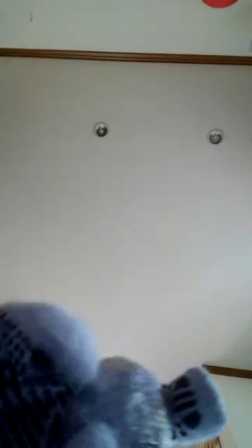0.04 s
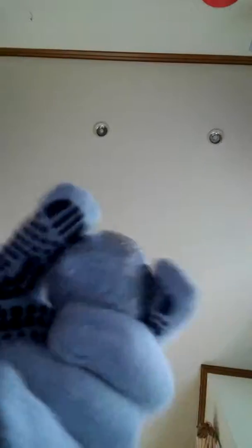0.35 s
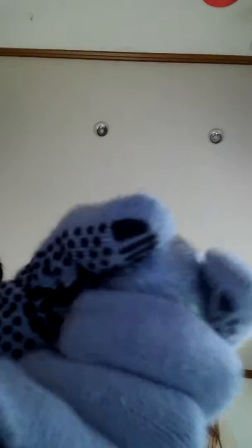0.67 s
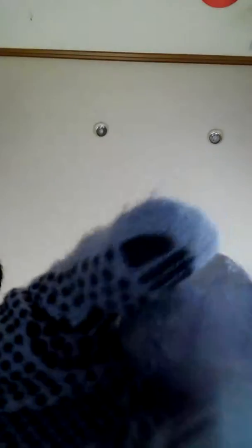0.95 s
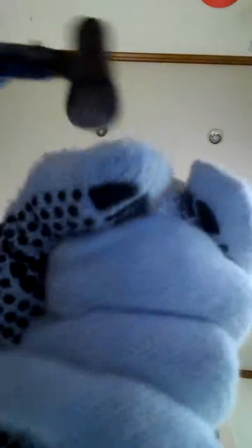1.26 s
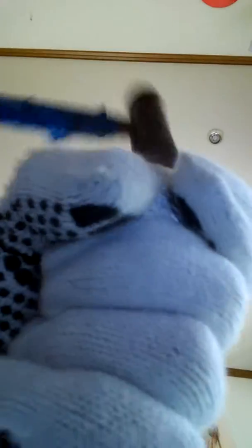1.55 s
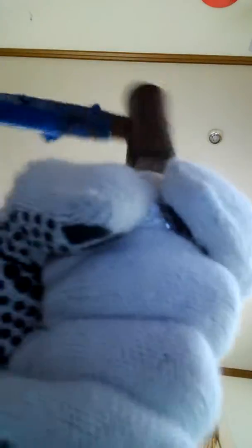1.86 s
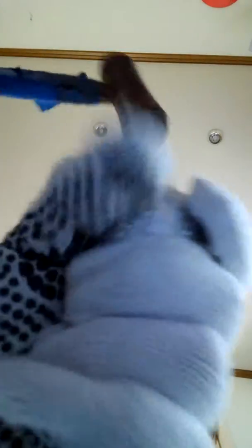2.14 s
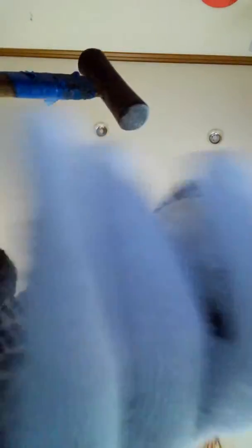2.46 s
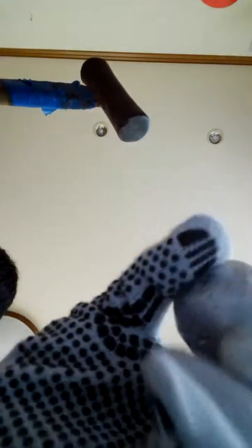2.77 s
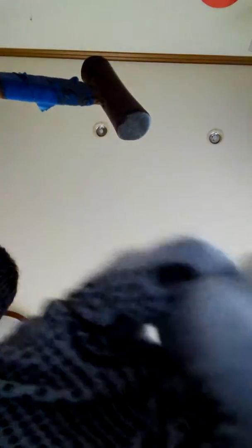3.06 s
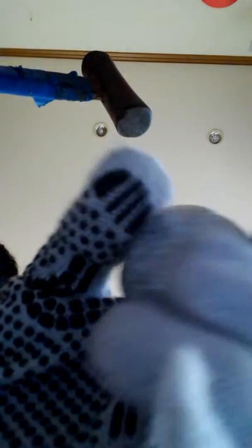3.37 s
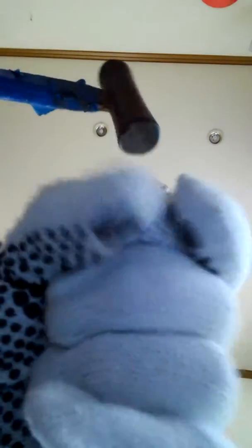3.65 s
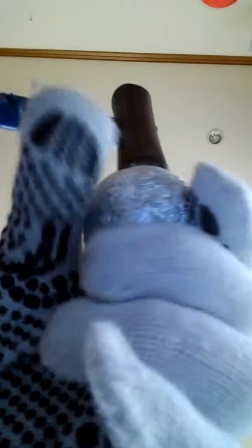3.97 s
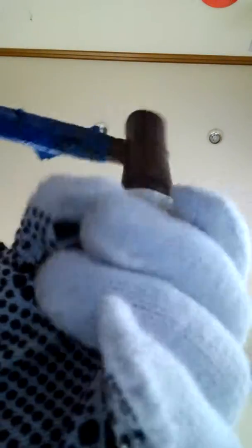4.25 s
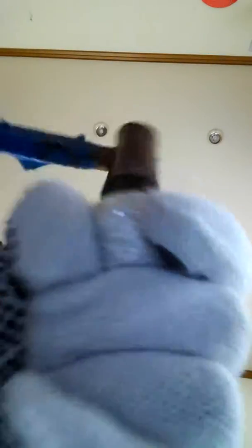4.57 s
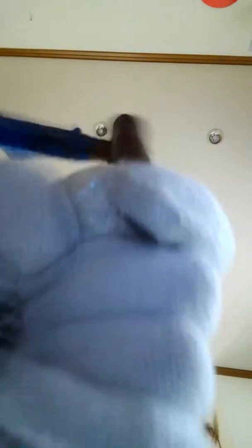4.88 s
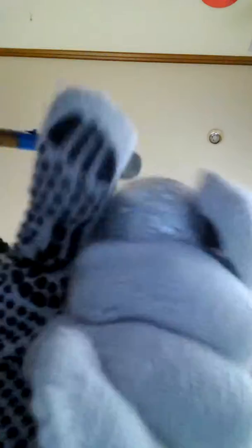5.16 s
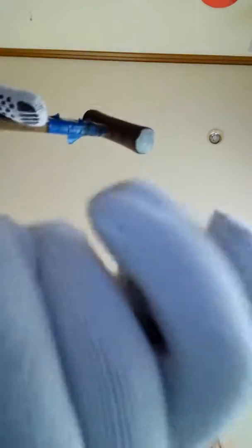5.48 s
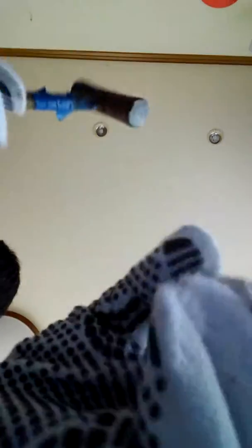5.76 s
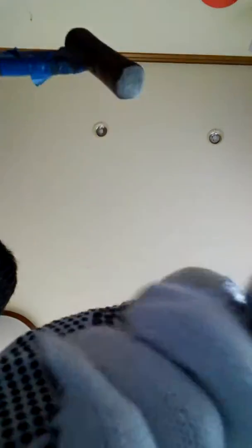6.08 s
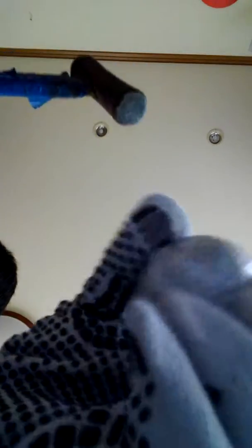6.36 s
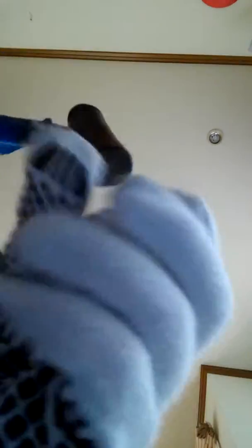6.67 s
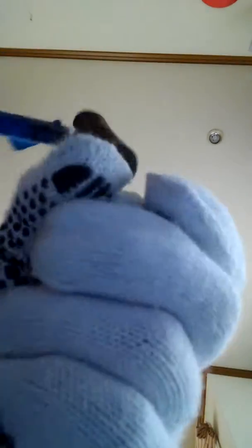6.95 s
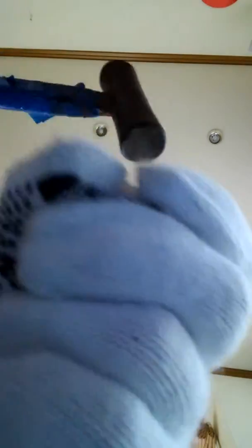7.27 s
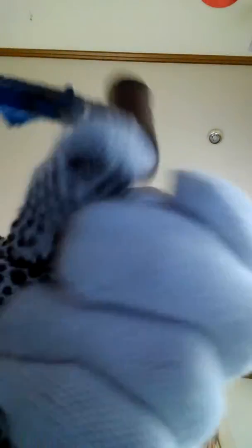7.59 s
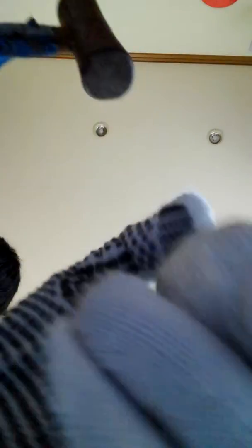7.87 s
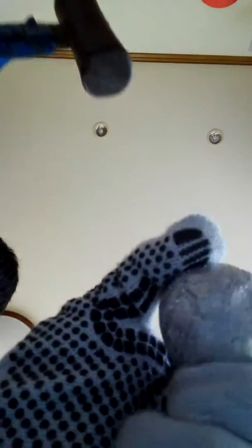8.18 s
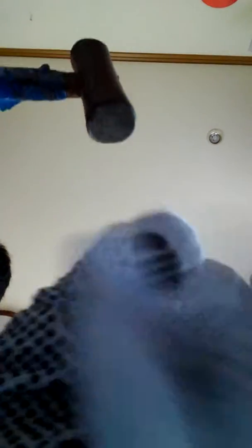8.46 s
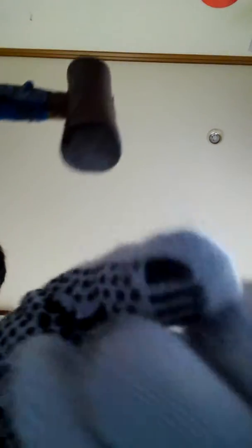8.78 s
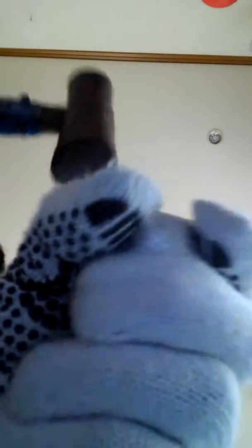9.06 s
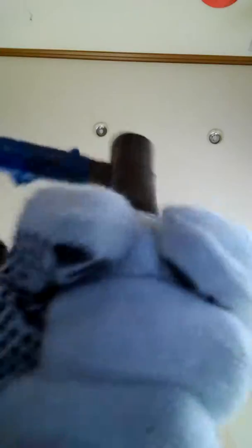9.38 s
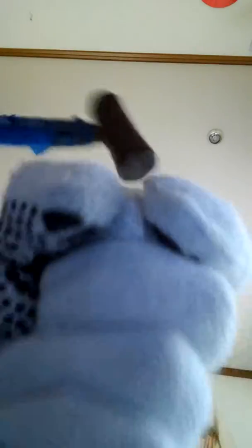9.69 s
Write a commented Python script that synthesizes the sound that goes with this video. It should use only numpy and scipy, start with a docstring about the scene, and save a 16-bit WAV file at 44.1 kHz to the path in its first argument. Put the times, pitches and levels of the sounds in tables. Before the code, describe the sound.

A small hammer taps a hard-packed foil ball held in a knitted glove. Each tap is a dead thud with a short, crisp crack. The taps come in quick groups of three, four, three and two, and between them the glove turns the ball with soft rustles and tiny snags. It is close to the microphone in a small room, with faint hiss and a deep drone that swells and fades early on.

```python
"""Hammer on a foil ball

A small hammer taps a hard-packed foil ball held in a knitted glove, close by in a small room.
Each tap is a dead thud with a short crack of buckling foil. Between the groups of taps the glove
turns the ball, rustling and snagging. Under it lie room hiss, faint hums and a deep drone that
swells and sinks in pitch, like a vehicle outside."""
import sys
import numpy as np
from scipy import signal
from scipy.fft import rfft, irfft
from scipy.io import wavfile
from scipy.ndimage import uniform_filter1d

SR = 44100
rng = np.random.default_rng(int(sys.argv[2]) if len(sys.argv) > 2 else 0)


def put_to_file(sound):
    """Save the sound as 16-bit audio at rate SR, in the file named by the first command-line argument."""
    columns = np.atleast_2d(sound).T  # one column per channel
    safe = np.clip(columns, -1, 1)
    whole_steps = np.round(safe * 32767)
    wavfile.write(sys.argv[1], SR, whole_steps.astype(np.int16))


N = 429093
TIME = np.arange(N) / SR

# Modes of the packed foil. Each row: centre in Hz, width in Hz, gain in dB.
FOIL_MODES = [(1120, 1650, -9), (2650, 2940, -10.5), (3200, 1040, -5.5), (6350, 970, -14),
              (9200, 1450, -13.5)]
# Hammer blows. Each row: start in seconds, thud gain in dB, contact in ms, crack gain in dB,
# ring of the struck spot in Hz, delay of the second buckle in ms, its relative size,
# tilt of the foil modes in dB per octave, gain of the treble passing the fingers in dB.
TAPS = [(1.6119, -24, 1.8, -11, 5970, 0.26, 0.55, -6.5, 0), (1.801, -23.5, 1.97, -6, 1440, 0.2, 0.2, 7, -2),
        (2.0001, -14.5, 1.01, 1, 2010, 0.31, .43, 6.5, -4.5),
        (4.2197, -30, 1.5, -19.5, 1826, 0.43, 0.69, 0, -1.5),
        (4.5285, -14, 1.2, .5, 1830, .18, 0.39, -0.5, -1),
        (4.7291, -15.5, 1.17, 3, 1970, 0.06, 0.71, -4, -2.5),
        (4.925, -12, 1.22, 3.5, 2616, .17, 0.23, 7, 1), (7.1448, -19, 1.98, -9.5, 3227, 0.41, 0.32, -6, -9),
        (7.3509, -17.5, 1.64, -8.5, 4330, 0.4, 0.45, -7.5, -7),
        (7.5376, -14, 1.22, 1.6, 4080, 0.13, 0.24, -1, -5),
        (9.3646, -14.5, 1.18, -5.5, 1287, .64, 0.65, -0.5, -1.5),
        (9.5571, -13.5, 0.93, 3.5, 1590, 0.56, 0.77, 3, 4.5)]


def hammer(foil_top_hz=9430, finger_shade_hz=5200, size=16384, lead=64):
    """A half-sine push shoves the ball and the foil buckles twice. Returns direct sound, room feed."""
    direct, room_feed = np.zeros(N), np.zeros(N)
    f = np.fft.rfftfreq(size, 1 / SR)
    time_ms = np.arange(size) / SR * 1000
    ball = resonance(f, hz=529, width_hz=1280)
    hand_sway = amp(-3) * resonance(f, hz=43, width_hz=49)
    rolloff = 1 / (1 + (f / foil_top_hz) ** 8) + amp(-26)
    shaded_band = 1 - 1 / (1 + (f / finger_shade_hz) ** 16)
    whole_ring = sum(amp(db) * resonance(f, hz, width_hz) for hz, width_hz, db in FOIL_MODES)
    for start_s, thud_db, contact_ms, crack_db, spot_hz, gap_ms, second, tilt_db, shade_db in TAPS:
        push = np.sin(np.pi * np.minimum(time_ms / contact_ms, 1))
        thud = amp(thud_db) * (ball + hand_sway) * rfft(push)
        buckles = second * np.exp(-2j * np.pi * f * gap_ms / 1000) - 1
        tilted_ring = sum(amp(db + tilt_db * np.log2(hz / 3200)) * resonance(f, hz, width_hz)
                          for hz, width_hz, db in FOIL_MODES)
        spot_ring = resonance(f, spot_hz, 0.33 * spot_hz)
        crack = amp(crack_db + shade_db * shaded_band) * buckles * (tilted_ring + spot_ring)
        radiated = -amp(1.7 + 0.98 * crack_db) * whole_ring
        for mix, foil in ((direct, crack), (room_feed, radiated)):
            add(mix, start_s - lead / SR, np.roll(irfft(thud + rolloff * foil), lead))
    return direct, room_feed


# Spectrum of knit rubbing foil. Each row: frequency in Hz, gain in dB.
KNIT_SPECTRUM = [(300, -7), (1000, -8.5), (1700, -6.5), (2500, 0.5), (3700, 1.5), (5200, 2), (6600, 3),
                 (8000, -1.5), (9600, -2), (11500, -17), (16000, -25)]


def knit(f):
    """Gain of the knit-on-foil friction spectrum at f in Hz."""
    return amp(lookup(KNIT_SPECTRUM, f))


def glove(slips_per_s=6000, split_hz=5600, scrape_width_hz=480, rest_hz=3870, flutter_db=1.52):
    """Fibres slip over the foil in dense tiny clicks, through a resonance that moves with the grip."""
    level_db, scrape_hz, swell_s = sliding(rest_hz)
    slips = rng.standard_normal(N) * (rng.random(N) < slips_per_s / SR) * grain(N, step_db=-1)
    dull = unit_rms(colour(slips, lambda f: knit(f) / np.sqrt(1 + (f / split_hz) ** 8)))
    bright = unit_rms(colour(slips, lambda f: 1j * knit(f) / np.sqrt(1 + (split_hz / (f + 1)) ** 8)))
    carrier = np.exp(2j * np.pi * np.cumsum(scrape_hz) / SR)
    pole = np.exp(-np.pi * scrape_width_hz / SR)
    scrape = unit_rms((carrier * signal.lfilter([1 - pole], [1, -pole], dull / carrier)).real)
    # A gentle slide rings, a hard one turns to hiss.
    ring = amp(-7.5 - 0.5 * np.clip(level_db + 63.5, -4, 12))
    body = (dull + ring * scrape) / np.sqrt(1 + ring + ring ** 2)
    # A higher scrape is also brighter.
    bright_db = -3 + 5.5 * np.log2(scrape_hz / rest_hz)
    bright_share = np.clip(amp(bright_db) ** 2, 0.05, 0.9)
    envelope = amp(level_db - 1 + flutter_db * wander(rate_hz=54)) * ribs(level_db, swell_s)
    return envelope * (np.sqrt(1 - bright_share) * body + np.sqrt(bright_share) * bright)


# Slides of the glove over the ball. Each row: peak time in seconds, swell in seconds,
# fade in seconds, level in dB, scrape resonance in Hz.
STROKES = [(.835, .07, .045, -56.5, 3730), (0.916, .022, .045, -53.5, 4600), (1.1, 0.073, .12, -63.5, 3280),
           (1.212, 0.03, 0.041, -55, 4230), (1.3, 0.026, 0.027, -58, 2900),
           (2.181, 0.013, .012, -57.5, 4540), (2.255, 0.068, 0.053, -59.5, 4100),
           (2.607, 0.021, .025, -63.5, 3680), (2.42, 0.087, 0.14, -68.5, 3870),
           (2.69, 0.041, 0.062, -63, 3900), (2.9, .015, .02, -64, 3020), (3.44, 0.075, 0.18, -64, 3730),
           (3.658, 0.045, 0.024, -51, 3950), (3.735, .013, 0.0454, -58.5, 3460),
           (3.92, 0.026, 0.073, -66, 3500), (4.41, 0.18, 0.042, -65.5, 4100),
           (4.665, 0.033, 0.023, -66, 3310), (5.091, 0.082, 0.057, -59.5, 4150),
           (5.157, 0.049, 0.048, -55, 4970), (5.28, 0.083, 0.051, -60, 3960),
           (5.43, 0.047, 0.042, -53.5, 4330), (5.57, 0.078, 0.051, -61, 3480),
           (5.648, 0.026, 0.038, -59, 4600), (5.76, 0.068, 0.15, -61.5, 4340),
           (5.912, 0.032, 0.07, -55.5, 3790), (6.0, 0.069, 0.076, -65, 3580),
           (6.23, 0.038, 0.018, -63, 3910), (6.472, 0.025, 0.016, -58.5, 3760),
           (6.66, 0.054, 0.052, -60.5, 3740), (7.075, 0.2, 0.041, -60, 4000),
           (7.285, 0.013, 0.015, -58, 3700), (7.682, 0.022, .018, -57.5, 3700),
           (8.08, 0.086, 0.037, -71, 3360), (8.33, .022, 0.019, -57.5, 4230),
           (8.376, 0.0031, 0.0059, -49.5, 4120), (8.551, 0.081, 0.12, -70.5, 3420),
           (8.87, .05, 0.082, -64, 4540), (9.302, .01, 0.018, -59, 4400), (9.69, 0.017, 0.018, -64, 3500)]


def sliding(rest_hz, creep_db=-78, creep_swing_db=7, roundness=1.53, hop=32):
    """Strokes swell and fade over the creep of the grip. Returns level_db, scrape_hz, swell_s."""
    t = TIME[::hop]
    power = amp(creep_db + creep_swing_db * wander(rate_hz=4.4)[::hop]) ** 2
    weighted_hz, weighted_swell = power * rest_hz, 0
    for peak_s, swell_s, fade_s, db, hz in STROKES:
        from_peak = np.maximum((peak_s - t) / swell_s, (t - peak_s) / fade_s)
        stroke_power = (amp(db) * np.exp(-from_peak ** roundness)) ** 2
        power += stroke_power
        weighted_hz += stroke_power * hz
        weighted_swell += stroke_power * swell_s
    controls = 10 * np.log10(power), weighted_hz / power, weighted_swell / power
    return [np.interp(TIME, t, control) for control in controls]


def ribs(level_db, swell_s, mid_hz=125, mid_db=-61, db_per_octave=7, bite_db_per_s=36):
    """Knit ribs pulse the rub: faster in strong strokes, deeper in slowly swelling ones."""
    rate_hz = mid_hz * 2 ** np.clip((level_db - mid_db) / db_per_octave, -1, 1)
    cycles = np.cumsum(rate_hz * np.exp(0.16 * wander(rate_hz=12.24))) / SR
    bite = amp(bite_db_per_s * swell_s * np.sin(2 * np.pi * cycles))
    return bite / np.sqrt(uniform_filter1d(bite ** 2, size=2048))


# Catches of the knit. Each row: start in seconds, length in seconds, level in dB, centre in Hz.
SNAGS = [(2.99, .006, -64, 4020), (3.022, 0.0088, -64, 2700), (3.717, 0.0052, -56.5, 4070),
         (3.912, 0.0044, -59, 4050), (4.445, .003, -56, 6000), (5.507, .0023, -55.5, 6140),
         (5.89, 0.0025, -52, 6050), (5.9465, 0.0026, -50.5, 5530), (6.476, .006, -58, 4000),
         (6.562, 0.0057, -60.5, 3400), (7.776, .0036, -56.5, 3170), (7.969, 0.0028, -51.5, 4170),
         (8.367, .013, -47.5, 4150), (8.484, 0.015, -59, 2680), (8.615, 0.0033, -52, 4450),
         (9.289, .004, -55, 4470), (9.507, 0.0066, -57, 4650)]


def snags(width_hz=3500):
    """The knit catches on a ridge of foil and lets go."""
    out = np.zeros(N)
    for start_s, length_s, db, hz in SNAGS:
        add(out, start_s, amp(db) * burst(length_s, lambda f: knit(f) * resonance(f, hz, width_hz)))
    return out


# Quick runs of the ribs. Each row: start in seconds, length in seconds, first and last rate in Hz,
# level in dB.
ZIPS = [(1.202, .018, 4200, 2900, -59), (5.571, .012, 2300, 3300, -60), (5.609, .014, 6000, 5100, -58),
        (5.635, .02, 4600, 2500, -57)]


def zips(jitter=0.21):
    """Ribs zip over a ridge of foil in a rough chirp whose pitch follows the sliding speed."""
    out = np.zeros(N)
    for start_s, length_s, first_hz, last_hz, db in ZIPS:
        hz = np.geomspace(first_hz, last_hz, int(length_s * SR))
        cycles = np.cumsum(hz * (1 + jitter * rng.standard_normal(len(hz)))) / SR
        tone = sum(knit(k * hz) * np.sin(2 * np.pi * k * cycles) for k in (1, 2, 3))
        add(out, start_s, amp(db) * unit_rms(tone * np.hanning(len(hz))))
    return out


# Rubs of the grip. Each row: start in seconds, length in seconds, level in dB, centre in Hz,
# width in Hz.
SCUFFS = [(3.6, 0.12, -57, 238, 72.5), (3.69, 0.079, -58.5, 148.6, 90), (3.695, 0.15, -63, 290, 49.7),
          (3.7, 0.115, -62, 1100, 685)]


def scuffs():
    """The grip closes on the ball with muffled bursts of noise."""
    out = np.zeros(N)
    for start_s, length_s, db, hz, width_hz in SCUFFS:
        add(out, start_s, amp(db) * burst(length_s, lambda f: steep_band(f, hz, width_hz)))
    return out


def recoils(full_thud_db=-12, full_length_s=0.041, delay_s=0.0053, hz=4350, width_hz=3500):
    """The ball jumps back and rasps on the knit; a heavier thud gives a longer, softer rasp."""
    out = np.zeros(N)
    for tap_s, thud_db, *_ in TAPS:
        force_db = thud_db - full_thud_db
        length_s = full_length_s * 2 ** (force_db / 1.5)
        rasp = burst(length_s, lambda f: knit(f) * resonance(f, hz, width_hz))
        add(out, tap_s + delay_s, amp(-52.5 - 0.4 * force_db) * rasp)
    return out


# Diffuse tail of the room. Each row: frequency in Hz, gain in dB, 60 dB decay time in seconds.
ROOM_BANDS = [(80, -0.5, 0.29), (161, -17, 0.1), (298, -23.5, 0.8), (490, -11.5, 0.22), (800, -14, 0.22),
              (1350, -12, 0.27), (2530, -14, 0.13), (3970, -18.5, 0.28), (6400, -11, 0.2),
              (10000, -11.5, 0.21), (15000, 3, 0.13)]
# Reflections off nearby surfaces. Each row: delay in seconds, gain in dB.
REFLECTIONS = [(.0027, -22), (.0062, -26.5), (.0082, -24), (0.015, -26.5), (0.016, -28.5), (.0222, -51),
               (0.0285, -26.5)]


def room(x, onset_s=0.0037, build_s=0.0022, size=22050):
    """Early reflections and a short diffuse tail, each band dying at its own speed."""
    hz, t, bands = signal.stft(rng.standard_normal(size), SR, nperseg=256)
    t60_s = lookup(ROOM_BANDS, hz, column=2)[:, None]
    energy = t60_s * SR / (2 * np.log(1000))
    bands = bands * amp(lookup(ROOM_BANDS, hz)[:, None] - 60 * t / t60_s) / np.sqrt(energy)
    build = np.clip((TIME[:size] - onset_s) / build_s, 0, 1)
    response = signal.istft(bands, SR, nperseg=256)[1][:size] * build
    for delay_s, db in REFLECTIONS:
        add(response, delay_s, amp([db]))
    return signal.fftconvolve(x, response)[:N]


def drone(high_hz=48, low_hz=29.57, sink_mid_s=2.95, sink_s=0.47, peak_s=2.56, peak_db=-42, stop_s=3.37):
    """A deep tone from outside sinks in pitch as it grows, eases off and dies away."""
    grow_db_per_s, ease_db_per_s, stop_db_per_s = 18, 7, 40
    hz = low_hz + (high_hz - low_hz) / (1 + np.exp((TIME - sink_mid_s) / sink_s))
    db = peak_db + np.minimum(grow_db_per_s * (TIME - peak_s), ease_db_per_s * (peak_s - TIME))
    db -= stop_db_per_s * np.maximum(TIME - stop_s, 0)
    return np.sqrt(2) * amp(db) * np.sin(2 * np.pi * np.cumsum(hz) / SR)


# Building hums. Each row: start in seconds, end in seconds, centre in Hz, width in Hz, level in dB.
HUMS = [(.3, 2.6, 194, 9.8, -71), (.3, 9.8, 368, 14, -80.5), (5.7, 10, 730, 65, -80),
        (5.9, 8.2, 1080, 163, -79)]


def hums(fade_s=0.5):
    """Faint hums in the building: narrow noise bands that waver, come and go."""
    out = np.zeros(N)
    for start_s, end_s, hz, width_hz, db in HUMS:
        gate = np.clip(np.minimum(TIME - start_s, end_s - TIME) / fade_s, 0, 1)
        out += amp(db) * gate * noise(lambda f: steep_band(f, hz, width_hz))
    return out


def hiss(level_db=-74.5, hz=8600, width_hz=2200, end_s=4.6, fade_s=0.96):
    """A fine high hiss lies under the first turns of the ball and fades away."""
    gate = np.clip((end_s - TIME) / fade_s, 0, 1)
    return amp(level_db) * gate * noise(lambda f: steep_band(f, hz, width_hz) * knit(f))


# Spectrum of the still room. Each row: frequency in Hz, relative density in dB.
AIR_SPECTRUM = [(20, -0.5), (35, 5), (50, 3.5), (70, -4.5), (120, -11.5), (230, -12.5), (310, -20),
                (420, -20.5), (600, -25), (1200, -29), (3000, -30.5), (6000, -33), (9000, -32.5),
                (12000, -33.5), (16000, -36.5)]


def air(level_db=-59):
    """Steady low rumble and hiss."""
    return amp(level_db) * noise(lambda f: amp(lookup(AIR_SPECTRUM, f)))


def amp(db):
    """Decibels to gain."""
    return 10 ** (np.asarray(db) / 20)


def unit_rms(x):
    """Scales to rms 1."""
    return x / np.sqrt(np.mean(x ** 2) + 1e-20)


def lookup(table, hz, column=1):
    """One column of a table, interpolated over log frequency."""
    columns = np.transpose(table)
    return np.interp(np.log(hz + 1), np.log(columns[0] + 1), columns[column])


def add(mix, start_s, sound):
    """Adds a sound into the mix in place."""
    part = mix[round(start_s * SR):][:len(sound)]
    part += sound[:len(part)]


def resonance(f, hz, width_hz):
    """Complex response of a damped mode, gain 1 at its centre."""
    return 1j * f * width_hz / (hz ** 2 - f ** 2 + 1j * f * width_hz)


def steep_band(f, hz, width_hz):
    """A resonance applied twice for steep skirts."""
    return resonance(f, hz, width_hz * 1.66) ** 2


def colour(x, response):
    """Filters x by a function of frequency."""
    return irfft(rfft(x) * response(np.fft.rfftfreq(len(x), 1 / SR)), len(x))


def noise(response):
    """Coloured noise of rms 1."""
    return unit_rms(colour(rng.standard_normal(N), response))


def wander(rate_hz):
    """Slow random drift of rms 1."""
    return noise(lambda f: np.exp(-(f / rate_hz) ** 2))


def grain(size, step_db):
    """A random gain per sample, up to four steps from unity."""
    return amp(step_db * np.minimum(rng.exponential(1, size), 4))


def burst(length_s, response, size=16384):
    """Short gritty coloured noise with soft ends, rms 1."""
    count = int(np.clip(length_s * SR, 16, size))
    grit = rng.standard_normal(size) * grain(size, step_db=3)
    return unit_rms(colour(grit, response)[:count] * signal.windows.tukey(count, 0.31))


def scene(hand_send_db=-6):
    """Hammer and glove in the room, over the background."""
    taps, room_feed = hammer()
    hand = glove() + snags() + zips() + scuffs() + recoils()
    reverb = room(room_feed + amp(hand_send_db) * hand)
    return (taps + hand + reverb + drone() + hums() + hiss() + air())[None]


def record(dry, start_s=0.575, fade_s=0.045, cutoff_hz=16400):
    """Silence, then a quick fade-in; a low-pass cuts the highest treble."""
    fade_in = 1 - np.exp(-np.maximum(TIME - start_s, 0) / fade_s)
    lowpass = signal.firwin(511, cutoff_hz, window=("kaiser", 9), fs=SR)
    return signal.oaconvolve(dry * fade_in, lowpass[None], "same")


dry = scene()
out = record(dry)
put_to_file(out)
```